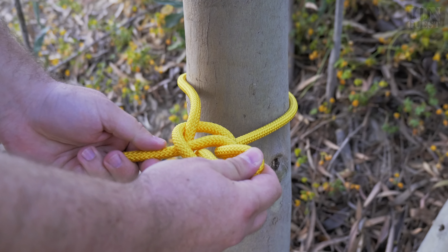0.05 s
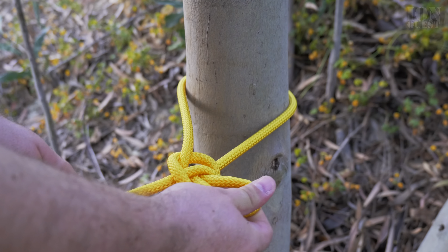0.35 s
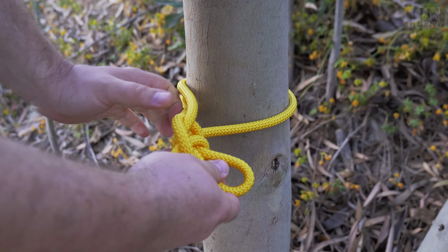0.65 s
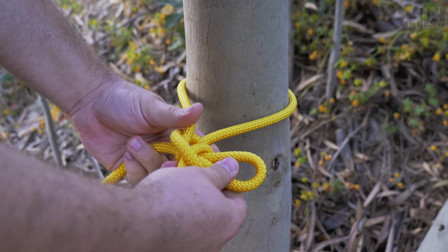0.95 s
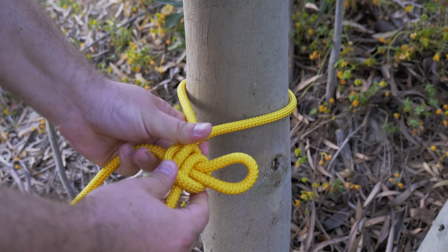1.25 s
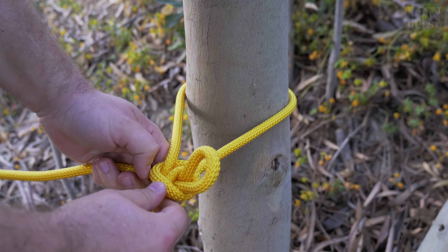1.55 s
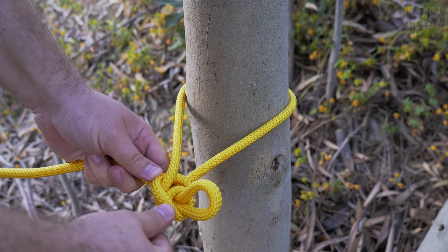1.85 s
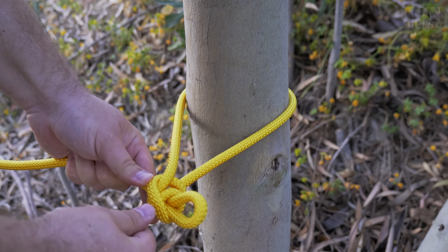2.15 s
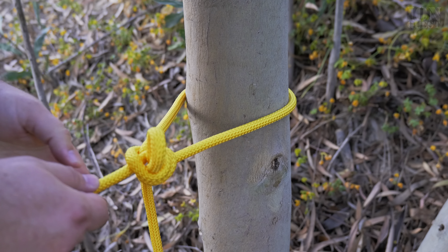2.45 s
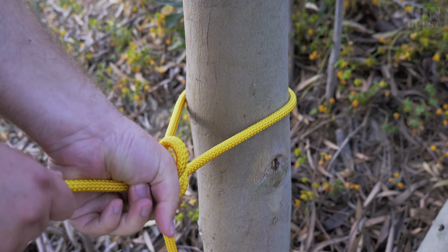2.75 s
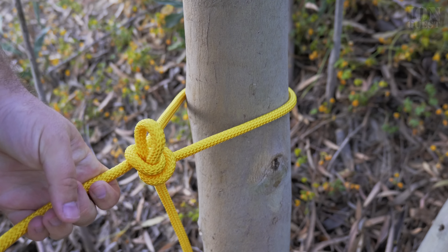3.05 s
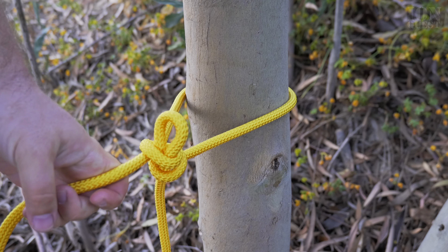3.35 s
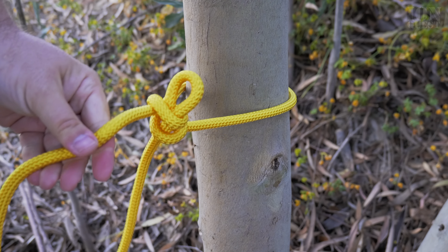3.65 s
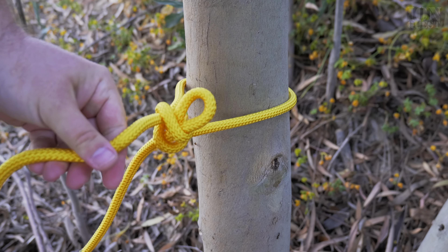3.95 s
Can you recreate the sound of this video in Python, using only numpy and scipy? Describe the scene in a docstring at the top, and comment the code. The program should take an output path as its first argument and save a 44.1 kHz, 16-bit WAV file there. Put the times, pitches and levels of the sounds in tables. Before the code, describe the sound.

A braided rope hisses and scrapes close to the microphone as hands tighten a knot around a tree trunk, with short rasps and faint squeaks. Small birds twitter in the distance over steady forest air and a low rumble.

```python
"""In a forest, a stereo microphone close to a tree trunk: a braided rope is knotted and pulled tight.
Its fibres hiss and scrape as it slides, rasp in short slips where it catches, and squeak and crackle
in the hands. Small birds twitter far off, one chirps on the left and one harsh chip comes from straight
ahead, all echoing off the trunks. Behind lie steady forest air, a low rumble and a hum that swells twice."""
import sys
import numpy as np
from scipy import signal
from scipy.fft import rfft, irfft
from scipy.io import wavfile

SR = 44100
rng = np.random.default_rng(int(sys.argv[2]) if len(sys.argv) > 2 else 0)


def transcribe(u):
    """Save the signal u as a 16-bit wav file named by the first command-line argument.

    u: samples, shape (n,) or (channels, n), limited to [-1, 1]; the rate is SR.
    q: integer samples, one column per channel.
    """
    v = np.clip(np.atleast_2d(u).T, -1, 1)
    q = np.round(v * 32767).astype(np.int16)
    wavfile.write(sys.argv[1], SR, q)


N = 176400
TIME = np.arange(N) / SR
BIN_HZ = np.arange(N // 2 + 1) * SR / N
BIRD_ECHO_DB = -9.5


def rope_slides(scraping, rise_db=5.5, fall_db=6, fade_s=0.0031, judder_hz=70):
    """Each slide swells to its fastest moment, eases and stops; the braid's uneven grip judders."""
    # fastest moment t/s, rise/s, fall/s, relative hiss level/dB, relative scrape level/dB
    slides = [(0.06, 0.043, 0.043, -39.5, -63), (0.212, 0.026, 0.082, -40.5, -48.5),
              (0.307, 0.061, 0.038, -34.5, -49.5), (0.457, 0.028, 0.022, -37.5, -38.5),
              (0.618, 0.029, 0.11, -43, -57.5), (1.03, 0.011, 0.059, -37.5, -48),
              (1.46, 0.12, 0.22, -45.5, -66), (1.832, 0.035, 0.019, -39.5, -49),
              (1.989, 0.034, 0.042, -36.5, -39.5), (2.325, 0.0053, 0.071, -38, -40),
              (2.51, 0.094, 0.1, -41.5, -43), (2.591, 0.033, 0.019, -34.5, -41),
              (2.714, 0.056, .11, -43.5, -45), (2.853, 0.024, 0.028, -38.5, -41),
              (2.988, 0.055, 0.098, -32.5, -39.5), (3.137, 0.062, 0.077, -35, -38.5),
              (3.254, 0.04, 0.021, -36, -36), (3.303, 0.0074, 0.062, -35, -42.5),
              (3.418, 0.057, .17, -46, -49.5), (3.635, 0.023, 0.012, -34.5, -58)]
    # hiss of sliding fibres: f/Hz, level/dB
    hiss_spectrum = [(1500, -32), (2800, -1), (6000, 2.5), (8000, 0), (11000, -4), (15500, -11)]
    hiss, scrape = np.zeros((2, N))
    for fastest, rise, fall, hiss_db, scrape_db in slides:
        near = slice(*np.searchsorted(TIME, [fastest - rise - fade_s, fastest + fall + fade_s]))
        age = TIME[near] - fastest
        gate = np.clip(.5 + .5 * np.minimum(age + rise, fall - age) / fade_s, 0, 1)
        speed = gate * from_db(np.interp(age, [-rise, 0, fall], [-rise_db, 0, -fall_db]))
        hiss[near] = np.hypot(hiss[near], speed * from_db(hiss_db + 2.5))
        scrape[near] = np.hypot(scrape[near], speed * from_db(scrape_db + 6.5))
    judder = from_db(1.5 * drift(judder_hz))
    return judder * (hiss * friction(hiss_spectrum) + scrape * scraping)


def rope_slips(scraping, tail_db=-15.5, tail_s=0.017):
    """The rope catches and slips: a brief rasp that starts faster than it ends, with a weak tail."""
    # t/s, half length/s, relative hiss level/dB, relative scrape level/dB
    slips = [(0.115, 0.0021, -53, -35.5), (0.826, 0.003, -32.5, -43.5), (0.8438, 0.0032, -25.5, -41),
             (0.897, 0.012, -27.5, -38), (1.395, 0.0065, -34, -59), (1.7394, 0.0027, -22.5, -38),
             (1.753, 0.0045, -29, -57), (1.785, 0.001, -24.5, -38), (1.827, 0.0024, -27, -47),
             (1.843, 0.004, -24.5, -60), (2.022, 0.0045, -30, -45), (2.0735, 0.0025, -32, -36.5),
             (2.089, 0.0016, -34, -37), (2.1163, 0.0025, -27, -37), (2.126, 0.0026, -24, -46),
             (2.155, 0.0047, -30, -61), (2.9407, 0.0017, -22.5, -26), (3.278, 0.011, -28, -45),
             (3.3046, 0.0023, -21, -39), (3.3706, 0.0032, -28.5, -38)]
    # brighter hiss of a slip: f/Hz, level/dB
    hiss_spectrum = [(1500, -35), (3000, 1), (7500, 9), (10500, 4.5), (15500, -7)]
    hiss, scrape = np.zeros((2, N))
    for t, half, hiss_db, scrape_db in slips:
        near = slice(*np.searchsorted(TIME, [t - 10 * half, t + 10 * tail_s]))
        age = TIME[near] - t
        width = half * np.where(age < 0, 0.88, 1)
        tail = (age > 0) * from_db(tail_db) * np.exp(-abs(age) / tail_s)
        burst = np.maximum(np.exp(-.5 * (age / width) ** 2), tail)
        hiss[near] += burst * from_db(hiss_db - 3)
        scrape[near] += burst * from_db(scrape_db + 6)
    return hiss * friction(hiss_spectrum) + scrape * scraping


def bark_scrape(rasp_hz=260, rasp_db=3.2):
    """The ribs of the braid bump over the bark and roughen the friction; rms 1."""
    # rope on bark: f/Hz, level/dB
    spectrum = [(300, 1), (800, -5.5), (1200, -2), (1750, -1), (2400, 1), (3750, -0.5), (5500, -4.5)]
    return rms_one(friction(spectrum) * from_db(rasp_db * drift(rasp_hz)))


def friction(spectrum, snaps_per_s=1800, grip_hz=35, grip_db=2.5):
    """Equal parts smooth rubbing and snapping fibres; each band wanders as the grip shifts."""
    snaps = rms_one(impulses(snaps_per_s))
    rub = rfft(np.sqrt(.5) * (snaps + noise()))
    band = np.searchsorted([1500, 2200, 3100, 4200, 5500, 7200, 9500, 12500], BIN_HZ)
    shifting = sum(irfft(rub * (band == k), N) * from_db(grip_db * drift(grip_hz))
                   for k in range(band[-1] + 1))
    return colour(shifting, spectrum)


def rope_squeaks(width_share=.09):
    """Taut strands rub over each other and ring briefly, each at its own pitch."""
    # t/s, half length/s, f/Hz, level/dB
    squeaks = [(0.633, .012, 8800, -41), (1.816, 0.0078, 7700, -38), (1.839, .005, 7700, -28.5),
               (2.002, .03, 1640, -42), (3.15, .03, 1185, -37), (3.256, .016, 1170, -37.5),
               (3.265, .012, 2320, -34)]
    out = np.zeros((2, N))
    for t, half, hz, db in squeaks:
        near = abs(TIME - t) < 10 * half
        strand = resonate(noise(near.sum()), hz, width_share * hz)
        swell = np.exp(-.5 * ((TIME[near] - t) / half) ** 2)
        out[:, near] += from_db(db) * swell * rms_one(strand)
    return out


def nail_flick(start_s=.9512, decay_s=.001):
    """A fingernail flicks off the braid: one thin, bright snap."""
    age = TIME - start_s
    burst = (age > 0) * np.exp(-np.clip(age / decay_s, 0, 20)) * noise()
    highpass = signal.butter(4, 7000, "high", fs=SR, output="sos")
    return from_db(-15) * signal.sosfilt(highpass, burst)


def fibre_crackle(base_ticks_per_s=260, q=9):
    """Single fibres snap and ring faintly as the rope is bent in the hands."""
    # how often they snap: t/s, gain on the base rate/dB
    activity = [(1, -4.5), (3.2, 3), (3.5, -9)]
    pitches = np.geomspace(5500, 13000, 10)
    ticks = impulses(base_ticks_per_s * level(activity))
    fibre = rng.integers(0, len(pitches), N)
    ringing = sum(resonate(ticks * (fibre == k), hz, hz / q) for k, hz in enumerate(pitches))
    return from_db(-56.5) * rms_one(ringing)


def hands():
    """Skin rubs softly on the rope as the knot is drawn tight."""
    # swell of the rustle: t/s, level/dB
    swell = [(1.7, -39), (2.4, -37.5), (2.8, -32.5), (3.2, -38.5), (3.6, -54)]
    # its dull colour: f/Hz, level/dB
    spectrum = [(150, 4), (280, -1), (600, -12.5)]
    return level(swell) * colour(noise(), spectrum)


def bird_chirps(warble_share=.018, glide_share=-.04, left_db=4.5):
    """A bird left of the microphone whistles short notes that waver and fall slightly."""
    # middle t/s, length/s, f/Hz, relative level/dB
    chirps = [(.165, .035, 4900, -44), (.195, .025, 3350, -42), (.98, .026, 5570, -37.5),
              (1.225, .055, 4220, -44), (1.34, .05, 4460, -41), (1.487, .031, 3500, -37),
              (1.617, .025, 3650, -39.5), (1.68, .03, 5250, -41), (1.742, .025, 3600, -39),
              (1.813, .025, 3130, -39), (1.86, .028, 3580, -39), (2.107, .025, 3750, -39),
              (2.123, .022, 3080, -34), (2.315, .02, 3790, -39), (2.387, .036, 3750, -31.5),
              (2.475, .035, 3720, -35), (3.385, .03, 2770, -40), (3.547, .03, 3870, -41),
              (3.596, .02, 5690, -32), (3.68, .03, 2890, -37), (3.988, .025, 5780, -41)]
    song = np.zeros(N)
    warble = 1 + warble_share * drift(240)
    for t, length, hz, db in chirps:
        track = hz * (1 + glide_share * np.linspace(-.5, .5, int(length * SR)))
        track *= warble.take(int(t * SR) + np.arange(len(track)), mode="wrap")
        add_whistle(song, t, track, db)
    song *= from_db(3 * drift(150) - 1)  # the strength flutters
    return song * pan(left_db) + from_db(BIRD_ECHO_DB) * trunk_echoes(song)


def harsh_chip(middle_s=3.446, length_s=.042, pitch_hz=4680, sweep_hz=430, sweeps_per_s=100):
    """One rough bird call straight ahead: pitch and strength flutter fast and unevenly."""
    call = np.zeros(N)
    age = TIME[:int(length_s * SR)]
    jitter, flutter = drift(900)[:len(age)], drift(400)[:len(age)]
    track = pitch_hz + sweep_hz * (np.sin(2 * np.pi * sweeps_per_s * age) + jitter)
    add_whistle(call, middle_s, track, db=-30 + 3.5 * flutter)
    return call + from_db(BIRD_ECHO_DB) * trunk_echoes(call)


def far_twitter(notes_per_s=100, low_hz=2650, high_hz=5500, glide_share=.16):
    """Small birds far off: many quick glides, half direct and half echoed among the trees."""
    # strength of the notes: t/s, relative level/dB
    strength = [(0.9, -52), (1.2, -46.5), (3.2, -47), (3.8, -44)]
    song = np.zeros(N)
    for when, length, pitch, glide, size in rng.random((int(notes_per_s * N / SR), 5)):
        t = when * N / SR
        hz = low_hz * (high_hz / low_hz) ** pitch
        ramp = np.linspace(-.5, .5, int(.01 * (1 + 2 * length) * SR))  # over 10 to 30 ms
        track = hz * (1 + glide_share * (2 * glide - 1) * ramp)
        db = np.interp(t, *np.transpose(strength)) + 10 * (size - .5)
        add_whistle(song, t, track, db)
    return (song + trunk_echoes(song)) / 2


def add_whistle(out, middle_s, track_hz, db):
    """Add one rounded bird note that follows a pitch track."""
    length = len(track_hz)
    at = int(middle_s * SR) - length // 2 + np.arange(length)
    note = from_db(db) * np.sqrt(2 * np.hanning(length)) * tone(track_hz)
    inside = (at >= 0) & (at < N)
    out[at[inside]] += note[inside]


def trunk_echoes(x, t60_s=.25):
    """Scattered echoes from the trunks, different on each side of the microphone."""
    age = TIME[:SR // 2]
    arrivals = rng.random((2, len(age))) < 900 / SR
    echoes = noise(len(age)) * arrivals * from_db(-60 * age / t60_s)
    echoes /= np.sqrt(np.sum(echoes ** 2) / 2)
    return signal.fftconvolve(x[None], echoes, axes=1)[:, :N]


def forest_air(air_db=-34):
    """Low rumble and the steady wash of air in the trees, all round the microphone."""
    # slow swell of the rumble: t/s, level/dB
    swell = [(0, -28), (1.55, -25), (2.1, -26), (4, -27)]
    # colour of the rumble: f/Hz, level/dB
    rumble_spectrum = [(22, -35), (32, -17), (42, -4.5), (60, 1.5), (80, -1.5), (100, -6.5), (130, -12),
                       (200, -25.5)]
    # colour of the air: f/Hz, level/dB
    air_spectrum = [(120, -4), (270, 0.5), (420, -5.5), (700, -8.5), (1150, -9.5), (2400, -20),
                    (4200, -19.5), (6500, -24), (15500, -35.5)]
    rumble = level(swell) * colour(noise(), rumble_spectrum)
    return rumble + from_db(air_db) * colour(noise(), air_spectrum)


def hum(waver_db=3):
    """A low, fluttering tone that swells twice."""
    # course of the hum: t/s, f/Hz, relative level/dB
    course = [(.06, 84, -20), (.18, 82, -22), (.27, 82, -70), (2.98, 100, -70), (3.09, 98, -26),
              (3.34, 96, -18.5), (3.58, 92, -22), (3.65, 96, -70)]
    t, hz, db = np.transpose(course)
    strength = from_db(np.interp(TIME, t, db) + waver_db * drift(17) - 1)
    return np.sqrt(2) * strength * tone(np.interp(TIME, t, hz))


def from_db(db):
    """Decibels to gain."""
    return 10 ** (np.asarray(db) / 20)


def rms_one(x):
    """Scale to rms 1."""
    return x / np.sqrt(np.mean(x ** 2) + 1e-20)


def level(curve):
    """Gain over time from rows of t/s, level/dB."""
    return from_db(np.interp(TIME, *np.transpose(curve)))


def pan(left_db):
    """Left and right gains for a level difference."""
    return from_db(np.array([[.5], [-.5]]) * left_db)


def tone(track_hz):
    """A sine that follows a pitch track."""
    return np.sin(2 * np.pi * np.cumsum(track_hz) / SR)


def noise(samples=N):
    """Two unrelated channels of white noise."""
    return rng.standard_normal((2, samples))


def impulses(per_s):
    """Clicks at random moments, with a random strength in each channel."""
    return noise() * (rng.random(N) < per_s / SR)


def drift(rate_hz):
    """Smooth random wander with spread 1."""
    step, settle = 40, 2000
    pole = np.exp(-2 * np.pi * step * rate_hz / SR)
    white = rng.standard_normal(N // step + settle + 2)
    slow = signal.lfilter([1], [1, -2 * pole, pole * pole], white)[settle:]
    return np.interp(np.arange(N) / step, np.arange(len(slow)), rms_one(slow))


def resonate(x, hz, width_hz):
    """One resonance, with gain 1 at its peak."""
    r = np.exp(-np.pi * width_hz / SR)
    feedback = [1, -2 * r * np.cos(2 * np.pi * hz / SR), r * r]
    return signal.lfilter(np.array([1, 0, -1]) * (1 - r * r) / 2, feedback, x + 1e-18)


def per_bin(points):
    """Read a table at every FFT bin, on a log-frequency axis."""
    hz, value = np.transpose(points)
    return np.interp(np.log(np.maximum(BIN_HZ, 1)), np.log(hz), value)


def colour(pair, spectrum):
    """Two unrelated excitations become stereo with this spectrum, narrow in the bass; rms 1."""
    # likeness of the microphone's two sides: f/Hz, correlation
    likeness = [(60, 0.96), (130, 0.96), (290, 0.27), (600, -0.084)]
    low, high = spectrum[0][0], spectrum[-1][0]
    rolloff = np.minimum(BIN_HZ / low, 1) ** 2 / np.maximum(BIN_HZ / high, 1) ** 2
    mid, side = rfft(pair) * from_db(per_bin(spectrum)) * rolloff
    alike = per_bin(likeness)
    stereo = np.sqrt(1 + alike) * mid + np.sqrt(1 - alike) * side * [[1], [-1]]
    return rms_one(irfft(stereo, N))


def scene():
    """The rope close in front and a little to the left, the birds beyond, the forest all round."""
    # where the rope is heard: t/s, left over right/dB
    rope_position = [(2.95, 0.8), (3.15, 5.5), (3.4, 1.5)]
    background = (forest_air() + hum()) * pan(left_db=1.8)
    scraping = bark_scrape()
    rope = rope_slides(scraping) + rope_slips(scraping) + rope_squeaks()
    rope += nail_flick() + fibre_crackle() + hands()
    rope *= pan(np.interp(TIME, *np.transpose(rope_position)))
    birds = bird_chirps() + harsh_chip() + far_twitter()
    return rope + birds + background


def record(dry, cutoff_hz=15800):
    """The top of the treble is cut steeply."""
    lowpass = signal.firwin(301, cutoff_hz, fs=SR)
    return signal.fftconvolve(dry, lowpass[None], "same", axes=1)


dry = scene()
out = record(dry)
transcribe(out)
```